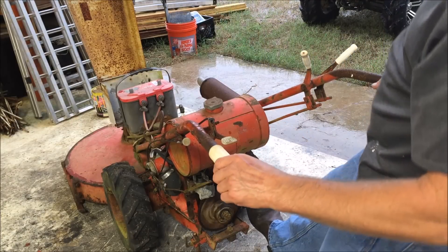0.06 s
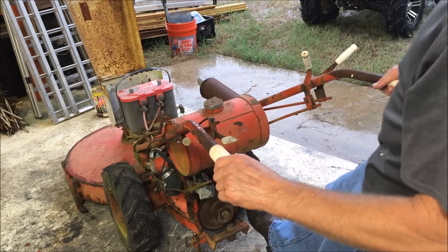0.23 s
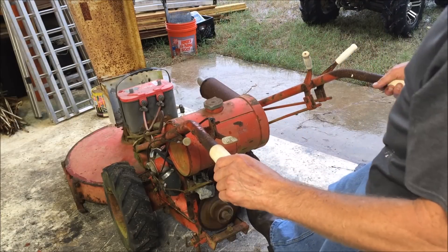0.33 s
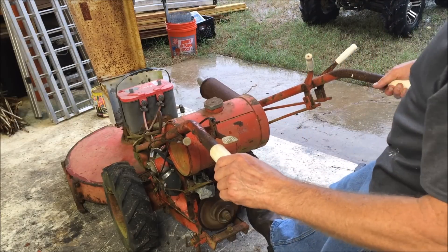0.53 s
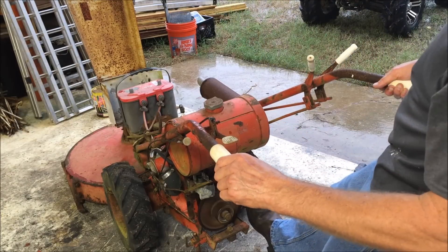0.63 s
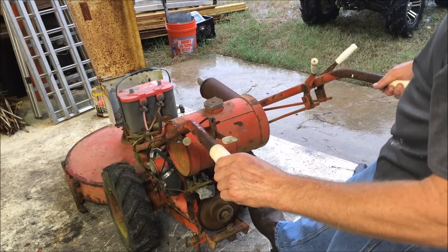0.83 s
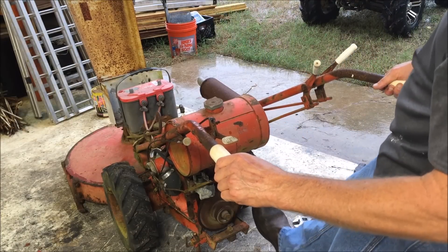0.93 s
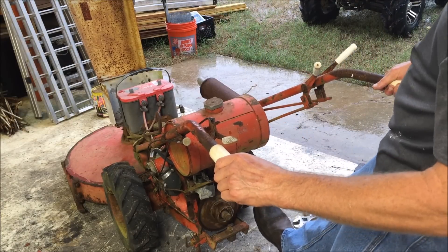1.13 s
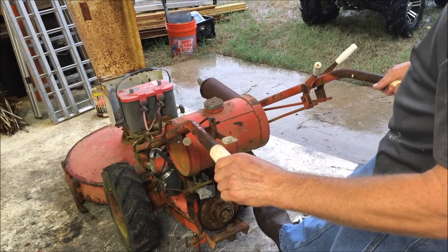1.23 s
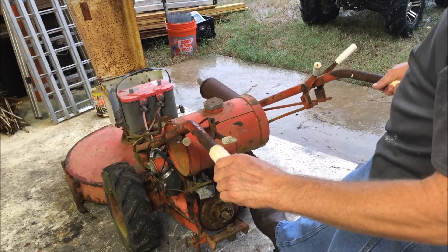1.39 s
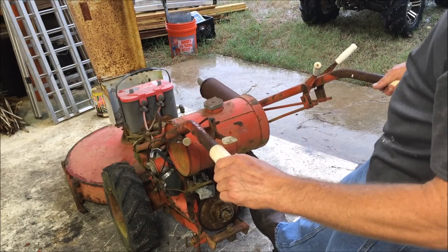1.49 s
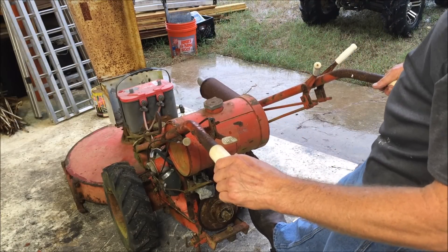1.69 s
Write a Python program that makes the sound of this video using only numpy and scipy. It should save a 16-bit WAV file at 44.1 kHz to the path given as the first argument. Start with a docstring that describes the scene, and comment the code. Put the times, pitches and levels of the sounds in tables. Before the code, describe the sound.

After a brief quiet outdoor hiss, a starter spins a small engine, grinding and whining with clanks and a droning frame, slows after about a second and ends in metallic clacks. Close, slightly overloaded, short hard echoes.

```python
"""Electric starter cranks a small engine in a yard for about a second; the engine does not catch.
Gear-tooth ticks quicken as it spins up: short bright bursts that blur into fizz and rattle the casting.
Noise-shaken frame and tank drone under a gear whine; loose metal knocks ring, crack and thud.
The frame moans in wavering tones; the starter winds down over a steady wash of outdoor hiss."""
import sys
import numpy as np
from scipy import signal
from scipy.fft import rfft, irfft
from scipy.io import wavfile
from scipy.ndimage import uniform_filter1d

SR = 44100
rng = np.random.default_rng(int(sys.argv[2]) if len(sys.argv) > 2 else 0)


def dump_mix(stems):
    """Bounce the given channels to the path in sys.argv[1] as a 16-bit WAV at rate SR."""
    frames = np.atleast_2d(stems).T  # one column per channel
    limited = np.clip(frames, -1, 1)  # hard clip at full scale
    pcm = np.round(limited * 32767).astype(np.int16)
    wavfile.write(sys.argv[1], SR, pcm)


N = 77175

# casting rattle level: t/s, level/dB
RATTLE_LEVEL = [(.205, -32), (.23, -27.5), (.28, -30), (.34, -22.5), (.43, -26), (.49, -22), (.65, -22.5),
                (.665, -40.5), (.68, -17.5), (.72, -24.5), (.77, -20.5), (.87, -21.5), (1.0, -23),
                (1.05, -23), (1.08, -22), (1.14, -27), (1.2, -29.5), (1.34, -32), (1.37, -37), (1.41, -28),
                (1.44, -33.5), (1.5, -38), (1.56, -52)]
# casting modes: f/Hz, relative level/dB, full t60/s
CASTING_MODES = [(855, 0.5, 0.11), (943, 4.5, 0.088), (1010, 5.5, 0.028), (1218, -1.5, 0.13),
                 (1470, -22, 0.032), (1651, 11, 0.048), (1845, 9.5, 0.017), (2079, 5.5, 0.03),
                 (2404, 5, 0.022), (2733, -2, 0.16), (3015, 2, 0.035)]
BLUR_HZ = 409  # reference tooth rate
PATCH_DB = 2


def amp(db):
    """dB to amplitude."""
    return 10 ** (np.asarray(db) / 20)


def evened(x):
    """Scales to unit RMS."""
    return x / np.sqrt(np.mean(x ** 2) + 1e-20)


def steady(x, size=2000):
    """Divides out the slow level so that a level curve can set it."""
    return x / np.sqrt(uniform_filter1d(x ** 2, size) + 1e-9)


def curve(table, col=1, off=-120.):
    """Interpolates a column over time; `off` outside the table."""
    rows = np.array(table)
    return np.interp(np.arange(N) / SR, rows[:, 0], rows[:, col], off, off)


def coloured(x, points):
    """Filters by a spectrum on a log-frequency axis, 26 dB down below its first point."""
    hz, db = np.transpose(points)
    f = np.fft.rfftfreq(len(x), 1 / SR)
    gain_db = np.interp(np.log(f + 1), np.log(hz), db, db[0] - 26)
    return irfft(rfft(x) * amp(gain_db), len(x))


def resonate(x, hz, width_hz):
    """Two-pole resonance of unit peak gain."""
    return signal.lfilter(*signal.iirpeak(hz, hz / width_hz, SR), x)


def smooth_noise(length, size):
    """Unit-RMS noise averaged over `size` samples."""
    return evened(uniform_filter1d(rng.standard_normal(length), size))


def grit(length=N, size=40):
    """Grains of uneven strength, about `size` samples long."""
    grit_db = 2
    return evened(amp(grit_db * smooth_noise(length, size)))


def patchy(x, depth_db, size):
    """Random level patches in time and frequency."""
    z = signal.stft(x, nperseg=size)[2]
    patches = uniform_filter1d(rng.standard_normal(z.shape), 6, 0)
    patches = evened(uniform_filter1d(patches, 6, 1))
    return evened(signal.istft(z * amp(depth_db * patches), nperseg=size)[1][:N])


def yard():
    """Steady outdoor hiss: shaped noise with faint patches."""
    # hiss spectrum: f/Hz, relative density/dB per Hz
    yard_colour = [(15, -56), (25, -27), (49, -10), (126, -2.5), (199, -9.5), (290, -7.5), (389, -6.5),
                   (458, -13), (1170, -2), (2430, -8), (15600, -52.5)]
    yard_db = -36
    hiss = coloured(rng.standard_normal(N), yard_colour)
    return amp(yard_db) * patchy(hiss, depth_db=1.5, size=512)


def teeth():
    """Uneven ticks, one per gear tooth, with the mesh phase in teeth and the tooth rate in Hz."""
    # starter speed: t/s, tooth rate/Hz
    speed = [(.199, 56), (.215, 126), (.23, 172), (.26, 280), (.31, 255), (.39, 396), (.5, 465), (.55, 515),
             (.66, 495), (.8, 510), (.95, 504), (1.1, 500), (1.3, 283), (1.42, 210)]
    spread_db, jitter_teeth = 0.5, 0.15  # jitter at BLUR_HZ
    rate_hz = curve(speed, off=0.)
    phase = np.cumsum(rate_hz) / SR
    wobble = smooth_noise(N, 200) * jitter_teeth * rate_hz / BLUR_HZ
    count = np.floor(phase + 1 + wobble) * (rate_hz > 0)
    hit = np.diff(np.maximum.accumulate(count), prepend=0) > 0
    ticks = hit * amp(spread_db * rng.standard_normal(N))
    return ticks, phase, rate_hz


def tick_bursts(ticks, t60_s):
    """Gives each tick an exponential decay."""
    t = np.arange(1500) / SR
    return signal.oaconvolve(ticks, amp(-60 * t / t60_s))[:N]


def fizz(ticks, rate_hz):
    """Each tick is a short bright burst; at speed they blur into hiss."""
    # level: t/s, level/dB
    fizz_level = [(.199, -42), (.23, -35.5), (.256, -30.5), (.35, -24.5), (.41, -22.5), (.44, -30),
                  (.49, -24.5), (.66, -23.5), (.68, -20.5), (.716, -27), (.74, -22.5), (.78, -21),
                  (.9, -22.5), (.93, -30.5), (1.026, -31.5), (1.054, -24.5), (1.1, -33), (1.136, -35.5),
                  (1.156, -25), (1.175, -33.5), (1.2, -44), (1.3, -55), (1.35, -68), (1.42, -72)]
    # spectrum: f/Hz, relative density/dB per Hz
    fizz_colour = [(1760, -7), (3000, -3.5), (3740, -2.5), (4790, -13.5), (5350, -9), (6900, -6),
                   (7970, -8), (9030, -3.5), (10800, -13), (11900, -8.5), (14000, -10), (17000, -10)]
    tick_t60_s, blur_share = .015, .18  # share at BLUR_HZ
    shape = tick_bursts(ticks, tick_t60_s) + blur_share * (rate_hz / BLUR_HZ) ** 2
    hiss = patchy(coloured(rng.standard_normal(N), fizz_colour), PATCH_DB, size=128) * grit()
    return hiss * steady(shape + 1e-4) * amp(curve(fizz_level))


def drone(phase, rate_hz):
    """Shaking rings the frame and tank; the gear mesh whines in the top group."""
    # resonances of frame and tank, four groups: f/Hz, width/Hz, relative level/dB
    frame = [
        [(142.4, 8.7, 0)],
        [(182.7, 13.9, 0)],
        [(228, 29.5, -2), (288.2, 21, 0), (321.8, 24.6, 0.5), (384.6, 16, -1)],
        [(479.5, 45, 5), (513, 21, -5)],
    ]
    # group levels: t/s, group 1..4 level/dB
    drone_level = [(0.2, -50, -56, -51, -52), (0.27, -35.5, -30.5, -32.5, -37),
                   (0.332, -54, -49, -30.5, -34), (0.39, -31, -22, -28, -25.5),
                   (0.46, -41, -29, -29, -27.5), (0.534, -31.5, -36.5, -31.5, -30),
                   (0.574, -42, -25.5, -29, -31.5), (0.624, -35.5, -33, -36, -32.5),
                   (0.664, -51, -23, -35, -25), (0.718, -35.5, -34.5, -34, -27.5),
                   (0.788, -35.5, -27.5, -30, -29.5), (0.866, -39.5, -29.5, -31.5, -28),
                   (0.932, -32.5, -42, -30, -27), (0.976, -44.5, -28.5, -32.5, -32),
                   (1.046, -37.5, -37.5, -33.5, -36.5), (1.116, -32.5, -26.5, -30.5, -31.5),
                   (1.28, -34.5, -39.5, -29, -35.5), (1.314, -60, -54, -35, -32.5),
                   (1.384, -50, -45.5, -39.5, -39.5), (1.6, -62, -55.5, -49, -45)]
    whine_db = -5  # at BLUR_HZ, relative to its group
    shake = rng.standard_normal(N)
    groups = []
    for modes in frame:
        rings = 0
        for hz, width_hz, db in modes:
            ring = resonate(resonate(shake, hz, width_hz), hz, 2 * width_hz)
            rings = rings + amp(db) * evened(ring)
        groups.append(steady(rings, size=1600))
    whine = amp(whine_db) * np.sin(2 * np.pi * phase) * (rate_hz / BLUR_HZ) ** 3
    groups[3] = evened(groups[3] + whine)
    return sum(g * amp(curve(drone_level, col=k + 1)) for k, g in enumerate(groups))


def rumble():
    """Low-frequency shaking: resonant noise that follows the rattle level."""
    rumble_db = -24  # relative to the rattle
    shake = resonate(resonate(rng.standard_normal(N), 73, 60), 60, 53)
    return evened(shake) * amp(rumble_db + curve(RATTLE_LEVEL))


def rattle(ticks):
    """Ticks and rubbing shake the casting: its modes over a broad grind."""
    # grind spectrum: f/Hz, relative density/dB per Hz
    rattle_colour = [(320, -89), (550, -5), (750, -3.5), (992, -1), (1520, -2), (1650, -3), (6000, -27.5),
                     (7800, -23), (13200, -120)]
    ring_db = -5  # relative to the grind
    rub_width = 1.6  # mode width/Hz times t60/s under steady rubbing
    push = steady(tick_bursts(ticks, t60_s=0.029) + 1.9)  # constant part: rubbing
    drive = patchy(rng.standard_normal(N), PATCH_DB, size=256) * push * grit(size=250)
    rings = sum(amp(db) * evened(resonate(drive, hz, rub_width / t60))
                for hz, db, t60 in CASTING_MODES)
    grind = evened(coloured(drive, rattle_colour))
    return steady(grind + amp(ring_db) * evened(rings), size=4000) * amp(curve(RATTLE_LEVEL))


def knocks():
    """Each blow: a quick contact rings the casting, with a noisy crack and a hollow thud."""
    # blows: t/s, ring peak/dB, ring tilt/dB per octave, rise/s, crack before filters/dB,
    # crack edge/Hz (capped at 16 kHz), decay length of ring and crack/share of full t60,
    # thud before its envelope/dB
    blow_table = [(0.206, -9.5, 2.5, 0.0056, -21, 7370, 0.66, -44),
                  (0.3182, -13.5, -13, 0.0018, -26, 8900, .6, -23),
                  (0.357, -14, 3, 0.0071, -14, 8700, 1.1, -15),
                  (0.4466, 1.5, -3, 0.0031, -4.5, 14700, 1, -19),
                  (0.675, -19.5, -18, 0.0076, -25, 12800, 4.9, 0.5),
                  (0.7217, -24, 11, .002, -17, 13000, 0.17, -33),
                  (0.907, -15, -18, 0.0043, -18.5, 9235, 0.4, -10),
                  (0.993, -25, 7, .004, -18.5, 14000, 0.67, -34),
                  (1.06, -12, -9, 0.0082, -18, 8900, 0.66, -25),
                  (1.104, -21, -12, 0.0041, -18.5, 12970, 0.2, -17.5),
                  (1.184, -36, 9, 0.0026, -20.5, 5000, 0.66, -19),
                  (1.2421, -29, 16, 0.0019, -30, 12900, 0.36, -31),
                  (1.3799, -13, -4, 0.0084, -15, 6200, 0.39, -46),
                  (1.453, -6.5, -6.5, 0.0027, -22, 7000, 0.42, -49),
                  (1.4589, -18, -3, .002, -44, 6000, 0.52, -50),
                  (1.473, -18, -8, .003, -29, 4980, 0.76, -43),
                  (1.516, -23.5, -11, 0.0039, -46, 5000, 0.68, -50)]
    focus_db = 6  # blows favour modes near 1.7 kHz: loss per octave away
    crack_t60_s, crack_soft_hz = 0.14, 6150  # full t60
    thud_hz, thud_t60_s, thud_rise_s = 462.3, 0.072, 0.011
    size = 9000
    out, t = np.zeros(N + size), np.arange(size) / SR
    hz, db, t60 = np.transpose(CASTING_MODES)[:, :, None]
    octaves = np.log2(hz / 1700)
    for start, ring_db, tilt_db, rise, crack_db, edge_hz, length, thud_db in blow_table:
        rising = np.sin(np.pi / 2 * np.minimum(t / rise, 1)) ** 2
        after = np.maximum(t - rise, 0) / length

        mode_db = db + tilt_db * octaves - focus_db * abs(octaves) - 60 * after / t60
        mode_phase = 9 * rng.standard_normal((len(hz), 1))
        ring = rising * (amp(mode_db) * np.sin(2 * np.pi * hz * t + mode_phase)).sum(0)

        crack = rng.standard_normal(size) * grit(size) * rising
        crack = crack * amp(crack_db - 60 * after / crack_t60_s)
        band = signal.butter(3, [1300, min(edge_hz, 16000)], "band", fs=SR, output="sos")
        crack = signal.sosfilt(band, crack)
        crack = signal.lfilter(*signal.butter(1, crack_soft_hz, fs=SR), crack)

        thud = np.sin(2 * np.pi * thud_hz * t) * (1 - np.exp(-t / thud_rise_s))
        thud = thud * amp(thud_db - 60 * t / thud_t60_s)

        at = round(start * SR)
        out[at:at + size] += amp(ring_db) * ring / abs(ring).max() + crack + thud
    return out[:N]


def walls(x):
    """Short scattered echoes from shed and concrete: sparse decaying noise taps after 6 ms."""
    echo_t60_s, size = 0.067, 12000
    t = np.arange(size) / SR
    tail = rng.standard_normal(size) * (rng.random(size) < .05) * (t > .006)
    tail = tail * amp(-60 * t / echo_t60_s)
    tail = signal.lfilter(*signal.butter(1, 5000, fs=SR), tail)
    return signal.fftconvolve(x, tail / np.linalg.norm(tail))[:N]


def moans():
    """Each frame moan is a soft, slightly rising tone that wavers."""
    # moans: start/s, length/s, mid pitch/Hz, level before doubling and grit/dB
    moan_table = [(0.499, 0.066, 332.3, -31), (0.637, 0.087, 367, -32), (0.883, 0.075, 378.5, -30.5),
                  (0.949, 0.083, 319.8, -31), (1.103, 0.156, 286, -32), (1.234, 0.072, 317, -35.5)]
    rise, waver_depth = .04, 0.025  # shares of the pitch: gain over one moan, RMS waver
    size = 9000
    out = np.zeros(N)
    for start, length, hz, db in moan_table:
        u = np.arange(0, length, 1 / SR) / length
        waver = waver_depth * smooth_noise(size, 600)[:len(u)]
        cycles = np.cumsum(hz * (1 + rise * (u - .5) + waver)) / SR + rng.random()
        swell = 2 * np.sqrt(np.sin(np.pi * u)) * grit(length=size, size=500)[:len(u)]
        out[round(start * SR):][:len(u)] += amp(db) * swell * np.sin(2 * np.pi * cycles)
    return out


def scene():
    """Sums starter, frame, knocks with their echoes, and yard."""
    wet_db = -15
    ticks, phase, rate_hz = teeth()
    blows = knocks()
    starter = fizz(ticks, rate_hz) + rattle(ticks)
    frame_sound = drone(phase, rate_hz) + rumble() + moans()
    mix = yard() + starter + frame_sound + blows + amp(wet_db) * walls(blows)
    return mix[None]


def record(dry):
    """Hard overload, then the band limit."""
    edge_hz = 15720
    lowpass = signal.firwin(511, edge_hz, window=("kaiser", 9), fs=SR)
    return signal.oaconvolve(np.clip(dry, -.95, .95), lowpass[None], "same")


dry = scene()
out = record(dry)
dump_mix(out)
```